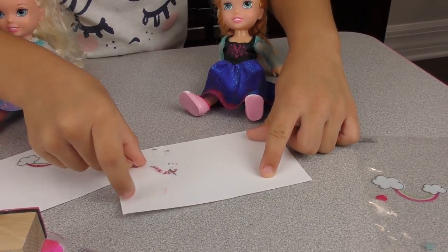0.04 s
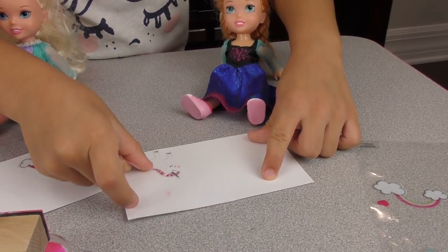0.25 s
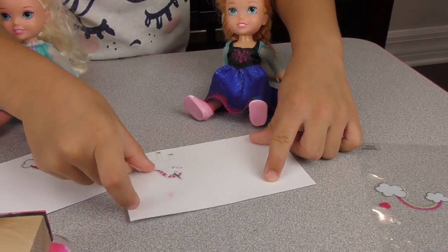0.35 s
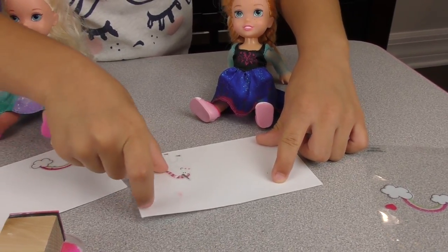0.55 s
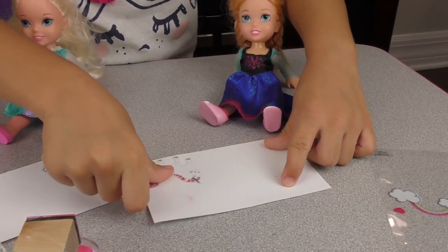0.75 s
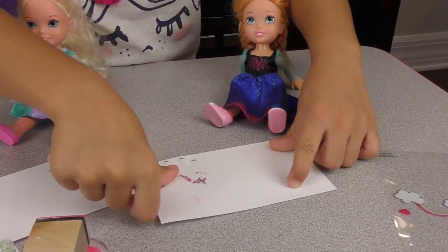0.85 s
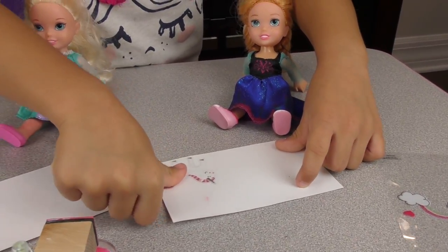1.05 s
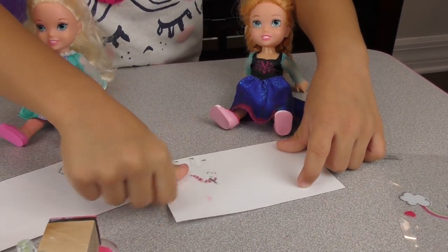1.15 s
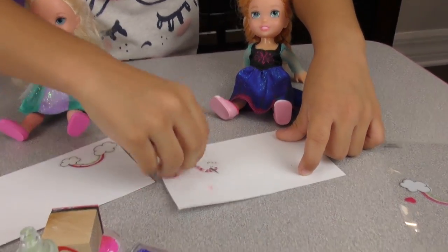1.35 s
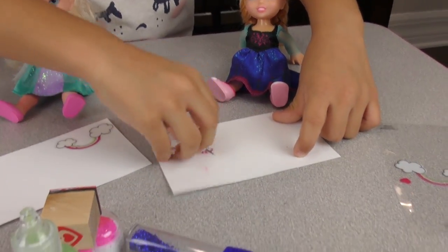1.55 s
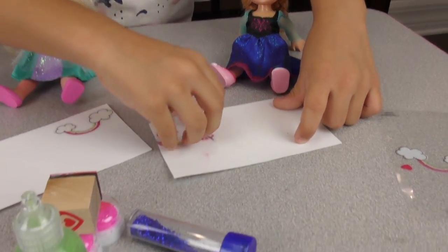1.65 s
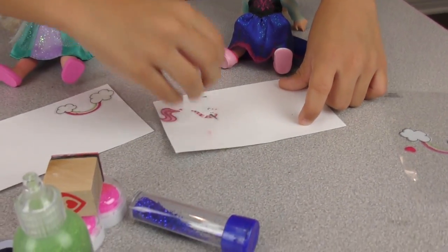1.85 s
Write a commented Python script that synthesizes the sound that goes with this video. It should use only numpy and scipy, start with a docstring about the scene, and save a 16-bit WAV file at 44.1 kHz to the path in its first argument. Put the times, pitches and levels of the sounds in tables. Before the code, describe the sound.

Small crisp clicks of a sticker pressed onto card, with paper brushing and two fingertip taps.

```python
"""Pressing a sticker onto a card

A sticker is pressed onto a paper card on a table, close to the microphone in a small room.
Its stiff film snaps under a thumb, fingers brush the paper, then the fingertips land twice on the table.
Behind it are a low room rumble and a faint whirr, probably a lens motor, that stops and starts again."""
import sys
import numpy as np
from scipy import signal
from scipy.fft import rfft, irfft, next_fast_len
from scipy.io import wavfile

SR = 44100
rng = np.random.default_rng(int(sys.argv[2]) if len(sys.argv) > 2 else 0)


def dump(signal):
    """Clip the signal to [-1, 1] and save it as 16-bit WAV at the path in sys.argv[1]."""
    limited = np.clip(np.atleast_2d(signal).T, -1, 1)
    pcm = np.round(limited * 32767).astype(np.int16)
    wavfile.write(sys.argv[1], SR, pcm)


N = 83790
T = np.arange(N) / SR
FREQS = np.geomspace(20, 20000, 120)  # pitches in Hz at which tone curves are drawn

# How alike the two ears hear scattered sound. Each row: pitch in Hz, likeness from 0 to 1.
EAR_LIKENESS = [(40, 0.9), (90, 0.83), (200, 0.82), (600, 0.69), (1500, 0.54), (4000, 0.61), (10000, 0.75)]
# The tone of the room's rumble. Each row: pitch in Hz, relative level in dB.
RUMBLE_TONE = [(20, -33), (42, -6.5), (80, -7), (110, -2), (150, 0.5), (220, -1), (310, -10), (430, -14.5),
               (560, -26), (780, -28), (1050, -21), (1600, -22.5), (2500, -25), (4000, -31.5),
               (6000, -40.5), (8000, -35.5), (10000, -31.5), (15500, -32.5)]
# When the motor runs. Each row: start in seconds, stop in seconds.
MOTOR_RUNS = [(-.1, .515), (1.06, 2.0)]
# Where the motor's housing rings. Each row: pitch in Hz, width in Hz, level in dB.
HOUSING_RINGS = [(1935, 75, -36), (2334, 103, -43), (2590, 150, -44.5), (2784, 94, -42), (3555, 102, -43)]
# The room's lingering sound. Each row: pitch in Hz, level in dB, seconds to fade by 60 dB.
ROOM_TAIL = [(60, -28, 0.31), (170, -9, 0.34), (396, -10.5, 0.33), (790, -8.5, 0.59), (1490, -6, 0.73),
             (2480, -9, 0.62), (5940, -6.5, 0.57), (8100, -9.5, 0.4), (10500, -19.5, 0.41),
             (15900, -18, 0.35)]
# Skin and nails brushing paper. Each row: start in seconds, length in seconds, hiss level in dB,
# hiss pitch in Hz, paper level in dB, left minus right in dB.
STROKES = [(0.033, 0.039, -39, 10200, -50.5, -1.5), (0.052, 0.0017, -31, 12300, -62, 11),
           (0.052, .0015, -33, 11200, -38, 9), (0.073, 0.0088, -32.5, 12500, -46.5, -1),
           (0.0796, 0.0065, -27.5, 13000, -39.5, 3), (0.509, 0.026, -36, 11000, -38, 0),
           (0.924, 0.035, -50.5, 10500, -57.5, 0), (0.928, 0.16, -53.5, 11300, -60, 1),
           (1.054, 0.016, -77, 11000, -49.5, -3), (1.152, 0.0095, -66, 11000, -50, -1),
           (1.206, 0.086, -46.5, 11200, -47, 0), (1.261, 0.0034, -40, 10900, -45, 3),
           (1.264, 0.015, -69, 11000, -41, -5), (1.295, 0.07, -48, 10700, -49, -1),
           (1.335, 0.0048, -45, 11500, -46, -3), (1.4306, 0.0023, -28, 10700, -31, 0),
           (1.434, 0.0022, -19.5, 11100, -26.5, 2), (1.4358, 0.005, -42, 10000, -32, -1),
           (1.466, 0.03, -42.5, 11300, -45.5, 1), (1.617, 0.00061, -19, 11900, -23, 0),
           (1.618, 0.0054, -21, 10200, -29, -0.5), (1.62, 0.016, -35, 11600, -31, 1),
           (1.667, 0.0088, -41.5, 13500, -40, 1), (1.675, 0.057, -43.5, 11700, -50.5, 1),
           (1.813, 0.072, -45.5, 12100, -48, 0)]
# The tone of brushed paper. Each row: pitch in Hz, relative level in dB.
PAPER_TONE = [(200, -4), (550, 3.5), (850, -4), (1150, 4.5), (1600, 4.5), (2100, -1), (2800, -3),
              (4500, -4.5), (7000, -6.5), (16000, -35)]
# Fingertips landing, the last two almost together. Each row: start in seconds, thud gain in dB,
# thud pitch in Hz, thud width in Hz, low ring gain in dB, high ring gain in dB.
FINGER_TAPS = [(1.4352, 23.5, 219, 210, 0, -16.5), (1.6218, 24, 252, 160, -1, -6.5),
               (1.625, 24, 395, 170, -5.5, 4)]
# How the table and the things on it ring. Each row: pitch in Hz, level in dB, seconds to fade by 60 dB.
TABLE_RINGS = [(42.2, -42.5, 0.58), (160, -39.5, 0.49), (360, -41.5, 0.34), (427.5, -40.5, 0.2),
               (1110, -39, 0.18), (1298, -50, 0.058), (1425, -45, .06), (1628, -43, 0.075),
               (2056, -44, 0.065), (2730, -55, 0.048)]
# Snaps of the film. Each row: start in seconds, tick gain in dB, tick pitch in Hz, tick width in
# octaves, knock gain in dB, knock's lower edge in Hz, knock's tilt in dB per octave,
# shiver gain in dB, left minus right in dB.
FILM_SNAPS = [(.2494, 11.5, 10230, 0.28, -6.5, 1110, -1, -3.5, 1),
              (0.4822, 4.5, 11800, 0.3, -11.5, 1710, 0, -11, 2.5),
              (.5081, 16, 11000, 0.27, -6, 250, 0.5, -10, 2.5),
              (0.5167, -16, 10900, 0.17, -3.5, 1300, -2, -1, -2),
              (0.5231, -7, 9500, 0.19, -18, 300, -1.5, -0.5, -7)]
# The tone of the knocked card. Each row: pitch in Hz, relative level in dB.
CARD_TONE = [(150, -2), (500, 3.5), (900, 1.5), (1300, -3.5), (2300, -2), (3500, -2.5), (4700, -3.5),
             (6200, -8.5), (9000, -7.5), (16000, 6.5)]
# Where the card rings briefly. Each row: pitch in Hz, width in Hz, gain in dB.
CARD_RINGS = [(1300, 220, 2), (1997, 240, 2), (2474, 270, -4.5), (3340, 520, 1), (4270, 280, -2),
              (5220, 220, -0.5), (6470, 340, 0.5)]


def from_db(db):
    """Turn decibels into a number to multiply by."""
    return 10 ** (np.asarray(db) / 20)


def at_hz(points, hz):
    """Read between the rows of a table, spacing pitches by octaves."""
    table = np.array(points)
    return np.interp(np.log(np.maximum(hz, 1)), np.log(table[:, 0]), table[:, 1])


def colour(x, points):
    """Give a sound the tone of a table of Hz and dB."""
    size = 2 * next_fast_len(N)
    gain = from_db(at_hz(points, np.fft.rfftfreq(size, 1 / SR)))
    cepstrum = irfft(np.log(gain))
    # Folding it in half keeps the filter from ringing before the sound arrives.
    cepstrum[1:size // 2] *= 2
    cepstrum[size // 2 + 1:] = 0
    return irfft(rfft(x, size) * np.exp(rfft(cepstrum)))[..., :N]


def shaped(x, gain):
    """Filter a sound with one gain for each pitch in FREQS."""
    return colour(x, np.c_[FREQS, 20 * np.log10(gain + 1e-6)])


def hump(hz, octaves):
    """A tone curve over FREQS with a round top and steep sides."""
    return 1 / np.sqrt(1 + np.abs(np.log2(FREQS / hz) / octaves) ** 3.2)


def band(x, hz, width_hz):
    """Keep the part of a sound near one pitch."""
    low = np.sqrt(hz ** 2 + (width_hz / 2) ** 2) - width_hz / 2
    high = min(low + width_hz, SR / 2 - 500)
    return signal.sosfilt(signal.butter(2, [low, high], "band", fs=SR, output="sos"), x + 1e-18)


def click(start):
    """A click one sample long."""
    return 1.0 * (np.arange(N) == int(start * SR))


def pan(db):
    """Left and right gains, with the left louder by db."""
    return from_db(np.array([[db], [-db]]) / 2)


def convolve(x, response):
    """Let every sample of a sound set off a copy of the response."""
    return signal.fftconvolve(np.atleast_2d(x), np.atleast_2d(response), axes=1)[:, :N]


def stereo_noise():
    """An even hiss, most alike in both ears in the bass."""
    mid, side = rfft(rng.standard_normal((2, N)))
    alike = at_hz(EAR_LIKENESS, np.fft.rfftfreq(N, 1 / SR))
    return irfft(np.sqrt((1 + alike) / 2) * mid + np.sqrt((1 - alike) / 2) * side * [[1], [-1]], N)


def fade(fade_s, delay_s=0):
    """A curve that falls 60 dB in fade_s, with a total energy of one."""
    curve = 1000 ** (-T / fade_s) * (T >= delay_s)
    return curve / np.sqrt(np.sum(curve ** 2))


def room_rumble():
    """The room's steady, low noise."""
    return from_db(-26.5) * pan(0.5) * colour(stereo_noise(), RUMBLE_TONE)


def motor_whirr():
    """A small motor's noise rings in its housing, over a soft hiss."""
    ramp_s = 0.0035
    running = sum(np.clip(np.minimum(T - start, stop - T) / ramp_s, 0, 1) for start, stop in MOTOR_RUNS)
    motor = stereo_noise()
    housing = sum(from_db(db) * band(motor, hz, width_hz) for hz, width_hz, db in HOUSING_RINGS)
    hiss = from_db(-52) * band(stereo_noise(), hz=1460, width_hz=2120)
    return running * (housing + hiss)


def room_echoes(x):
    """Sound comes back as one near echo, a quick scatter off the table and a fading tail."""
    noise, freqs = rfft(stereo_noise()), np.fft.rfftfreq(N, 1 / SR)
    tail, delay_s = 0, 0.0022
    for hz, db, fade_s in ROOM_TAIL:
        share = at_hz([(row[0], row[0] == hz) for row in ROOM_TAIL], freqs)  # picks out this band
        tail += from_db(db) * irfft(noise * share, N) * fade(fade_s, delay_s)
    scatter = from_db(-13.5) * stereo_noise() * fade(0.12, delay_s)
    # A near surface, heard mostly on the right.
    echo = from_db([[-26], [-14]]) * band(click(0.0021), hz=10000, width_hz=5200)
    return convolve(x, tail + scatter + echo)


def paper_rubs():
    """Paper fibres catch and slip under each stroke, which swells and fades."""
    catches_per_s, spread_db, smooth_share = 1500, 3.5, 0.55
    grains = (rng.random(N) < catches_per_s / SR) * rng.choice([-1, 1], N)
    grains = grains * from_db(spread_db * np.minimum(rng.exponential(1, N), 4))
    friction = grains / grains.std() + smooth_share * stereo_noise()
    out = 0
    for start, length, hiss_db, hz, paper_db, pan_db in STROKES:
        swell = np.sin(np.pi * np.clip((T - start) / length, 0, 1))
        stroke = friction * swell
        stroke *= np.sqrt(np.mean(swell ** 2) / np.mean(stroke ** 2))  # as much energy as the swell
        hiss_tone = from_db(hiss_db) * hump(hz, octaves=0.27)
        paper_tone = from_db(paper_db + at_hz(PAPER_TONE, FREQS))
        out += pan(pan_db) * shaped(stroke, np.hypot(hiss_tone, paper_tone))
    return out


def table_taps():
    """Each fingertip makes a dull thud, and the table rings on faintly."""
    soft_hz, detune = 553, 0.0037  # soft fingertips give little above soft_hz
    thuds, rings = 0, 0
    for start, thud_db, thud_hz, width_hz, low_db, high_db in FINGER_TAPS:
        thuds += from_db(thud_db) * band(click(start), thud_hz, width_hz)
        age = np.maximum(T - start, 0)
        for hz, db, fade_s in TABLE_RINGS:
            ring_db = db + (low_db if hz < soft_hz else high_db)
            ring_hz = hz * (1 + detune * rng.standard_normal())
            rings += from_db(ring_db - 60 * age / fade_s) * np.sin(2 * np.pi * ring_hz * age)
    return signal.sosfilt(signal.butter(8, soft_hz, fs=SR, output="sos"), thuds) + rings


def sticker_snaps():
    """The film ticks and knocks the card. Returns the snaps and the shaking they give the card."""
    snaps, shaking, pivot_hz = 0, 0, 2000
    for start, tick_db, hz, octaves, knock_db, edge_hz, tilt_db, shiver_db, pan_db in FILM_SNAPS:
        knock_tone = from_db(knock_db + tilt_db * np.log2(FREQS / pivot_hz))
        knock_tone /= np.sqrt(1 + (edge_hz / FREQS) ** 8)  # little is left below the edge
        knock = shaped(click(start), knock_tone)
        rings = sum((-1) ** k * from_db(db) * band(knock, ring_hz, width_hz)
                    for k, (ring_hz, width_hz, db) in enumerate(CARD_RINGS))
        tick_tone = from_db(tick_db) * hump(hz, octaves)
        card_tone = knock_tone * from_db(at_hz(CARD_TONE, FREQS))
        snap = rings + shaped(click(start), np.hypot(tick_tone, card_tone))
        snaps += pan(pan_db) * snap
        shaking += from_db(shiver_db) * snap
    return snaps, shaking


def card_shiver(shaking):
    """The shaken card gives a short, dense shiver after each snap."""
    return convolve(shaking, stereo_noise() * fade(fade_s=0.0098))


def scene():
    """The hands' sounds, their echoes and the card's shiver, over the background."""
    snaps, shaking = sticker_snaps()
    hands = snaps + paper_rubs() + table_taps()
    return card_shiver(shaking) + room_rumble() + hands + room_echoes(hands) + motor_whirr()


def record(dry):
    """The microphone drops the deepest bass, flattens peaks at full scale and cuts the top treble."""
    bass_cut = signal.butter(2, 31, "high", fs=SR, output="sos")
    treble_cut = signal.cheby2(16, 70, 16700, fs=SR, output="sos")
    clipped = np.clip(signal.sosfilt(bass_cut, dry), -1, 1)
    return signal.sosfilt(treble_cut, clipped)


dry = scene()
out = record(dry)
dump(out)
```